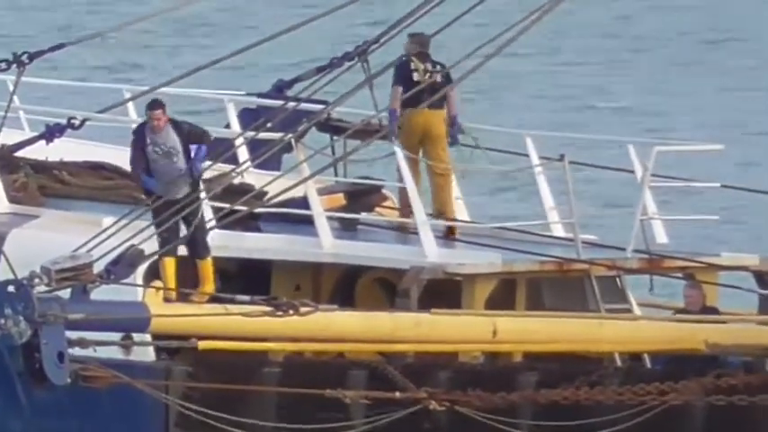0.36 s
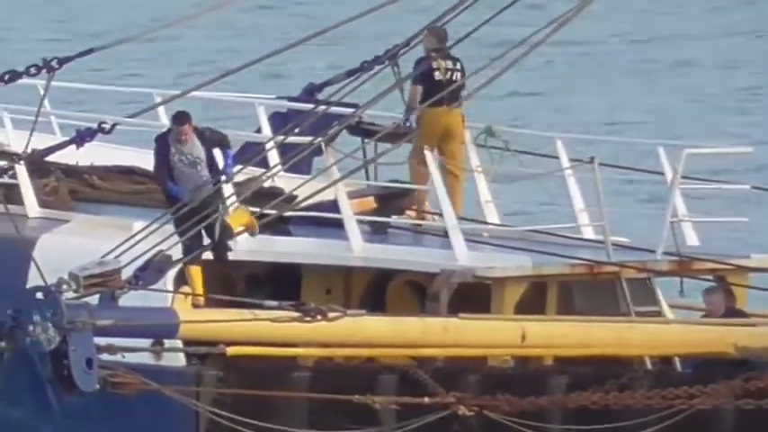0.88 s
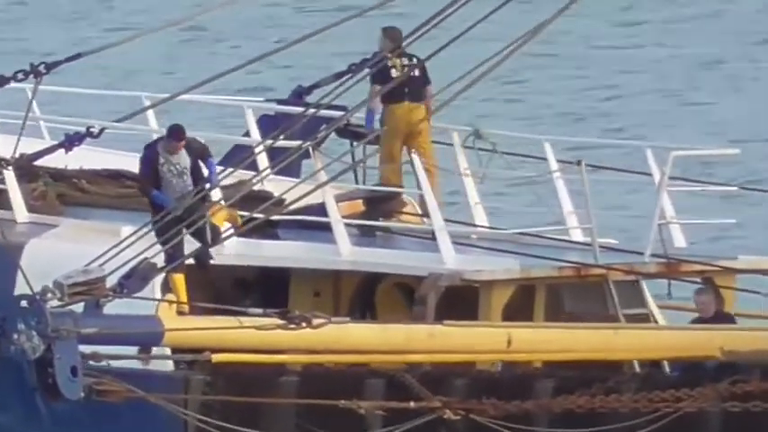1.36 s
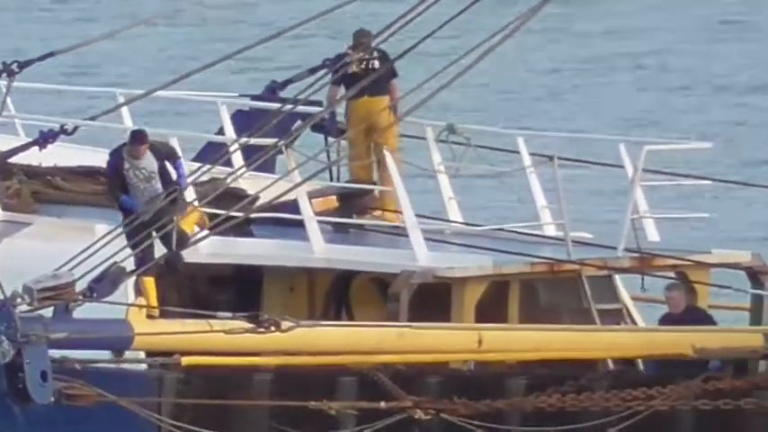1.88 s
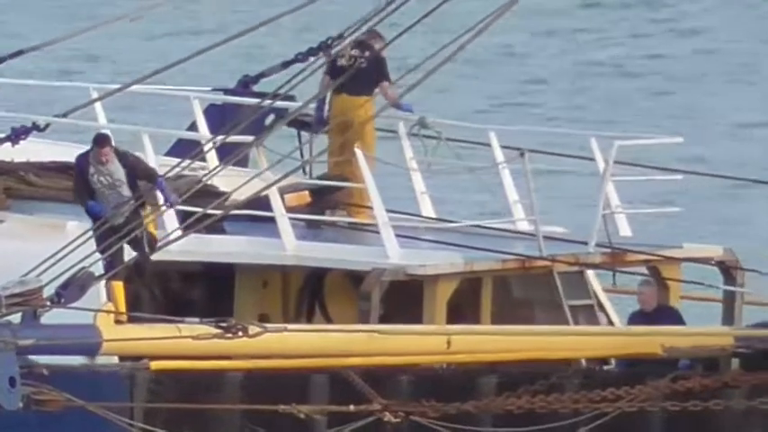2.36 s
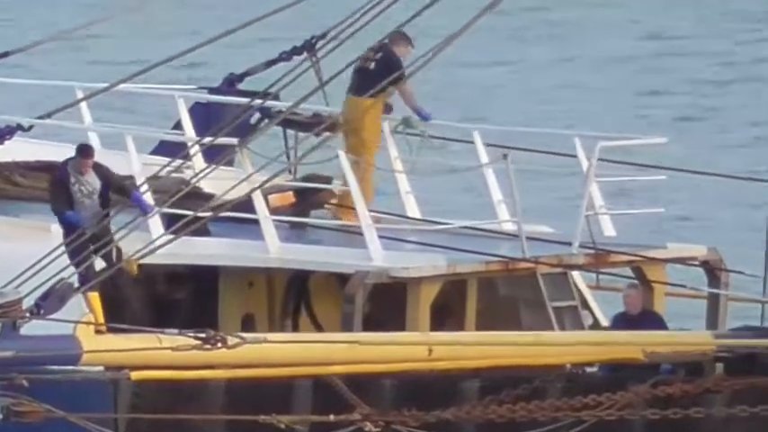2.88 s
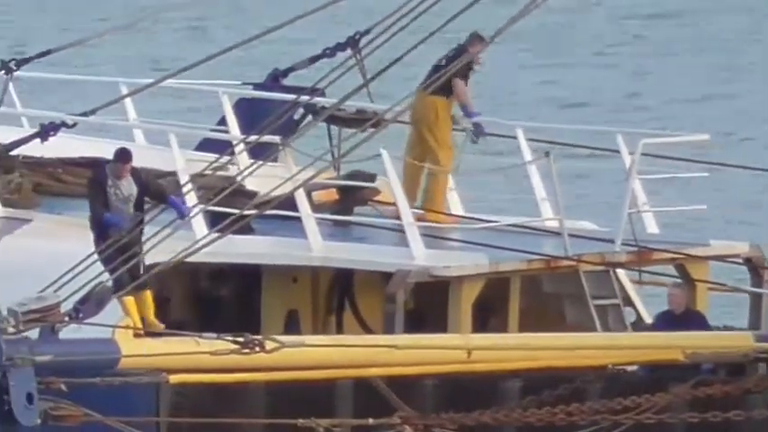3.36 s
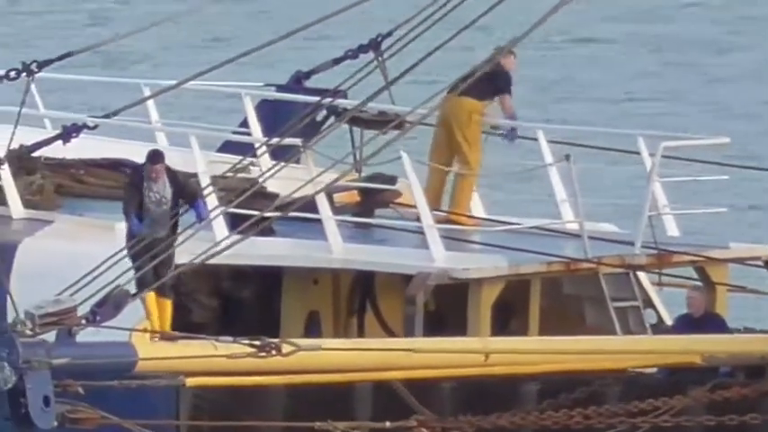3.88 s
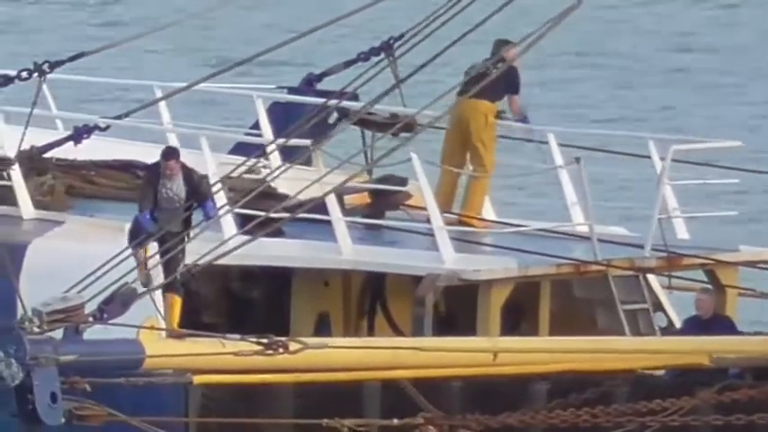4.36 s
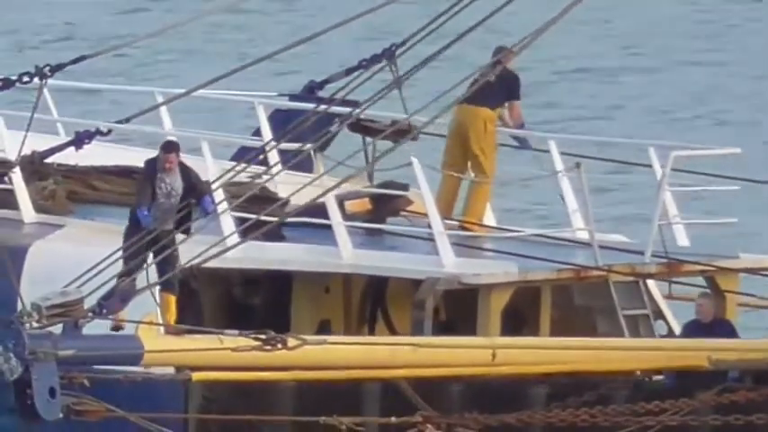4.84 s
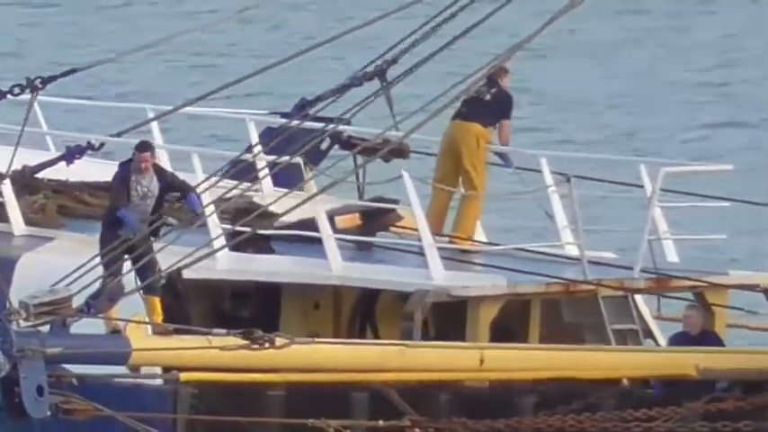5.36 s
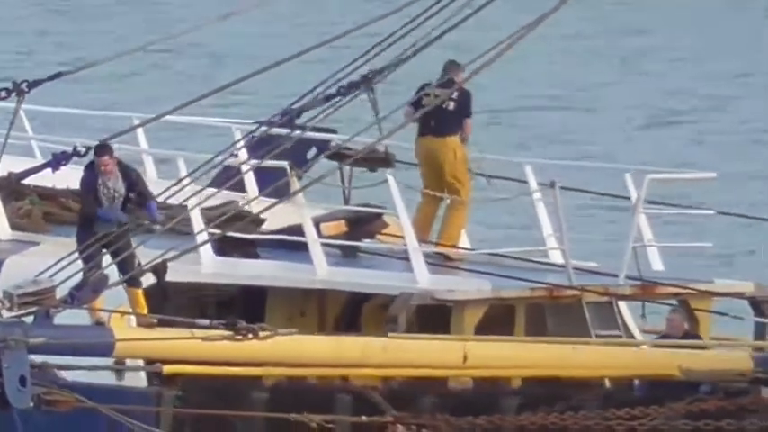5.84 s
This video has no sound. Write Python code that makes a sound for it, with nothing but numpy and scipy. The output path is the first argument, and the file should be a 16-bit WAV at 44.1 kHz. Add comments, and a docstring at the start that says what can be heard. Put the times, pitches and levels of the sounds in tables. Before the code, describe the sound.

A distant outdoor microphone picks up mostly low-frequency machinery: an idling diesel, other steady motor tones and a dark rumble. A low hum drifts in and out, growing boldest late on. Grainy water stays faint beneath, gently ebbing. Far-off bird whistles flick by around two seconds, then a few close, brittle clicks, and one longer, very faint high chirp. Light treble hiss continues throughout.

```python
"""A harbour heard from the quay. Throughout, a diesel idles, other machines add thin tones over a broad rumble,
and a treble hiss flickers in narrow streaks: sines make the machines, coloured noise the rest. A hum from across
the water, nearly a sine, swells and fades, strongest after four seconds. Faint water noise swells early and again
near two and three seconds. Gliding sines chirp far off from 1.5 to 2.1 s; ringing crackles tick from 3.1 to 4.3 s;
a last, longer chirp follows at 4.6 s."""
import sys
import numpy as np
from scipy import signal
from scipy.fft import rfft, irfft, next_fast_len
from scipy.io import wavfile
from scipy.ndimage import uniform_filter1d

SR = 44100
rng = np.random.default_rng(int(sys.argv[2]) if len(sys.argv) > 2 else 0)


def master_out(mix):
    """Clip the mix to full scale and print it as 16-bit PCM to the path in sys.argv[1]."""
    frames = np.transpose(np.atleast_2d(mix))
    ceiling = np.clip(frames, -1, 1)
    pcm = np.round(ceiling * 32767).astype(np.int16)
    wavfile.write(sys.argv[1], SR, pcm)


def ratio_of_db(decibels):
    """Turn decibels (scalar or array-like) into linear amplitude factors; 0 dB maps to 1."""
    return 10 ** (np.asarray(decibels, float) / 20)


N = 263718  # length in samples, about 6 s


def rms_one(x):
    """Scale a signal so that its average strength (rms) is 1."""
    return x / np.sqrt(np.mean(x ** 2) + 1e-20)


def in_time(rows):
    """Draw straight lines between the points of a curve and read its columns at every sample."""
    seconds, *columns = np.transpose(rows)
    return [np.interp(np.arange(N) / SR, seconds, column) for column in columns]


def at_hz(points, hz):
    """Read a curve over frequency, with frequency on a log scale as the ear hears it."""
    point_hz, value = np.array(points).T
    return np.interp(np.log(hz), np.log(point_hz), value)


def drift(rate_hz):
    """Slow random wandering of rms 1: noise smoothed by two equal low-passes with their corner at rate_hz."""
    coarse = 40  # samples between the points of the slow curve
    r = np.exp(-2 * np.pi * rate_hz * coarse / SR)
    noise = rng.standard_normal(N // coarse + 4002)
    slow = signal.lfilter([1], [1, -2 * r, r * r], noise)[4000:]  # leave out the filter's start
    return np.interp(np.arange(N) / coarse, np.arange(len(slow)), rms_one(slow))


def pan(x, left_db):
    """Place a mono sound between the microphones; left_db is left minus right."""
    return x * ratio_of_db(np.array([[.5], [-.5]]) * left_db)


def coloured(spectrum, white):
    """Shape two white noises to a level per Hz, then mix them so that left and right are partly alike."""
    # How alike left and right are. Each row: frequency in Hz, likeness from 0 to 1.
    likeness = [(30, .92), (130, .97), (290, .78), (640, .52), (1400, .14), (3100, .22), (6800, .13),
                (15000, .13)]
    # Which side is louder. Each row: frequency in Hz, left minus right in dB.
    balance = [(60, 0.26), (240, 0.0), (950, 1.0), (3770, 0.0058), (15000, -0.25)]
    size = next_fast_len(N)
    hz = np.maximum(np.arange(size // 2 + 1) * SR / size, 1)
    mid, side = rfft(white, size) * np.sqrt(SR / 2) * ratio_of_db(at_hz(spectrum, hz))
    alike = np.clip(at_hz(likeness, hz), 0, 1)
    mid = mid * np.sqrt((1 + alike) / 2)
    side = side * np.sqrt((1 - alike) / 2)
    tilt = ratio_of_db(at_hz(balance, hz) / 2)
    return irfft([(mid + side) * tilt, (mid - side) / tilt], size)[:, :N]


def streaky(noise, streak_db):
    """Make narrow bands of a noise sink and return, each for about a tenth of a second."""
    spectrum = signal.stft(noise, nperseg=2048, noverlap=1536)[2]
    flicker = rms_one(uniform_filter1d(rng.standard_normal(spectrum.shape), size=8, axis=-1))
    gain = ratio_of_db(streak_db * np.minimum(flicker, .6))  # dips go deep, peaks are capped
    out = signal.istft(spectrum * gain, nperseg=2048, noverlap=1536)[1][:, :N]
    return out * np.std(noise) / np.std(out)  # keep the overall strength


def wavering(hz, level_db, waver_db):
    """A sine whose level wavers slowly on its way over the water."""
    phase = 2 * np.pi * (hz * np.arange(N) / SR + rng.random())
    level = ratio_of_db(level_db + waver_db * drift(1.3))
    return np.sqrt(2) * level * np.sin(phase)


def hiss():
    """Hiss: treble noise in which narrow streaks flicker."""
    # Spectrum of the hiss. Each row: frequency in Hz, level in dB per Hz.
    hiss_spectrum = [(1000, -125), (4000, -120), (6300, -118.5), (7900, -109.5), (8500, -111), (9300, -109),
                     (10300, -111), (11400, -108.5), (12800, -112), (13300, -110), (13700, -112.5),
                     (14050, -108.5), (14500, -112), (16000, -113)]
    return coloured(hiss_spectrum, streaky(rng.standard_normal((2, N)), streak_db=15.0))


def chirps():
    """Far bird: short gliding whistles, roughened by distance, trembling in level and unsteady in pitch."""
    # Each row: start in seconds, length in seconds, first pitch in Hz, last pitch in Hz,
    # level in dB before the fade and tremble.
    notes = [(1.475, .045, 4380, 4350, -82), (1.82, .028, 4110, 4110, -75), (1.853, .018, 4100, 4150, -74),
             (1.858, .018, 4300, 4600, -78), (1.872, .03, 4400, 4360, -76), (2.045, .03, 3400, 3380, -78),
             (2.08, .035, 3250, 3420, -79), (4.57, .28, 5060, 5075, -85)]
    fade_db_per_s = 25
    out = np.zeros((2, N))
    tremble = ratio_of_db(1.5 * drift(70))
    unsteady_hz = 15 * drift(50)
    for start, length, first_hz, last_hz, db in notes:
        i, n = round(start * SR), round(length * SR)
        hz = np.linspace(first_hz, last_hz, n) + unsteady_hz[i:i + n]
        note = np.sin(2 * np.pi * np.cumsum(hz) / SR)
        note *= signal.windows.tukey(n, .5)  # soft start and end
        note *= ratio_of_db(-fade_db_per_s * np.arange(n) / SR)
        out[:, i:i + n] += np.sqrt(2) * ratio_of_db(db) * note * tremble[i:i + n]
    return out


def ticks():
    """Each tick is a brief broad crackle that also strikes the short ringing tones of a plastic body."""
    # Each row: start in seconds, peak level in dB before panning, brightness of the ring in dB per octave,
    # left minus right in dB.
    strikes = [(3.1084, -53, -4, -1), (3.6622, -41, 0, -6), (3.6655, -50, 6, -3), (3.7700, -60, 0, 0),
               (4.2584, -52, 3, -1), (4.2704, -49, 5, -1)]
    # Ringing tones of the body. Each row: frequency in Hz, level in dB before the brightness is added,
    # time to fade by 60 dB in seconds.
    body = [(2700, -16, .012), (4000, -9, .005), (6960, -6, .003), (9320, -4, .003), (12300, -4, .003),
            (14800, -6, .003)]
    crackle_s, ring_db = .0005, -12.0  # time for the crackle to fall to 37 %, gain of the ring
    out = np.zeros((2, N))
    t = np.arange(SR // 50) / SR
    for start, peak_db, bright_db, left_db in strikes:
        i = round(start * SR)
        crackle = rng.standard_normal(len(t)) * np.exp(-t / crackle_s)
        ring = 0
        for hz, mode_db, t60 in body:
            fading_db = mode_db + bright_db * np.log2(hz / 8000) - 60 * t / t60
            ring = ring + ratio_of_db(fading_db) * np.sin(2 * np.pi * hz * t)
        struck = np.convolve(ring, crackle)[:len(t)]
        tick = np.diff(crackle, prepend=0) + ratio_of_db(ring_db) * struck  # the difference brightens the crackle
        out[:, i:i + len(t)] += pan(ratio_of_db(peak_db) * tick / np.abs(tick).max(), left_db)
    return out


def wash():
    """Water: grainy noise like dense droplets, ebbing steadily, swelling now and then and fluttering a little."""
    # Spectrum of the wash. Each row: frequency in Hz, level in dB per Hz before the changes in time.
    wash_spectrum = [(700, -125), (1500, -113), (1850, -111), (2150, -105.5), (2700, -111), (3500, -111),
                     (4200, -111), (5200, -116), (6300, -122), (8000, -120), (12000, -124)]
    # Each row: centre of the swell in seconds, width in seconds, rise in dB.
    swells = [(0.4, 0.056, 0.86), (2.3, 0.27, 4.8), (3.0, 0.4, 2.1)]
    start_db, ebb_db_per_s, grain_db = 0.72, -0.63, 3.0
    t = np.arange(N) / SR
    level_db = start_db + ebb_db_per_s * t
    for centre, width, rise_db in swells:
        level_db += rise_db * np.exp(-((t - centre) / width) ** 2)
    droplet_size = np.minimum(rng.exponential(1, N), 4)
    grains = rng.standard_normal((2, N)) * ratio_of_db(grain_db * droplet_size)
    water = coloured(wash_spectrum, streaky(rms_one(grains), streak_db=4.5))
    return ratio_of_db(level_db + 0.2 * drift(25)) * water


def rumble():
    """Engines and wind: broad coloured noise, breathing slowly and slightly lumpy."""
    # Spectrum of the rumble. Each row: frequency in Hz, level in dB per Hz before the breathing.
    rumble_spectrum = [(15, -108), (30, -91), (48, -81), (62, -78), (95, -77), (135, -70.5), (200, -74),
                       (228, -80), (250, -72), (285, -79), (400, -80.5), (560, -84.5), (700, -88),
                       (1000, -92.5), (1300, -96.5), (1550, -99), (1800, -108), (3000, -130)]
    breathing_db = 0.27 * drift(0.88) + 0.61 * drift(6.1)
    return ratio_of_db(breathing_db) * coloured(rumble_spectrum, rng.standard_normal((2, N)))


def machines():
    """Other machines: unrelated tones of steady pitch and gently wavering level."""
    # Each row: frequency in Hz, level in dB around which the tone wavers.
    tones = [(51.8, -74), (86.8, -66), (95.6, -64), (100.3, -61), (250.3, -62), (15625, -92)]
    return sum(wavering(hz, db, waver_db=1.5) for hz, db in tones)


def diesel():
    """Idling diesel: every tone is a whole multiple of one steady engine cycle."""
    # Each row: multiple of the engine cycle, level in dB around which the tone wavers.
    orders = [(5, -80), (6, -61), (7, -70.5), (12, -56), (13, -60), (14, -76.5), (15, -56), (18, -65),
              (19, -64.5), (21, -68.5), (22, -77.5), (23, -76.5), (24, -75), (30, -74.5), (31, -74.5),
              (33, -75), (40, -77), (44, -77.5), (45, -78), (46, -77.5)]
    cycle_hz = 12.147
    return sum(wavering(order * cycle_hz, db, waver_db=2.5) for order, db in orders)


def hum():
    """Hum from across the water: a direct sine beats against a scattered share of wandering size and phase."""
    # The direct hum swells and fades as the air between changes. Each row: time in seconds, level in dB.
    hum_level = [(0.0, -42.5), (0.15, -41.5), (0.5, -44.5), (0.74, -38), (1.15, -45.5), (1.31, -58),
                 (1.5, -46), (1.7, -48.5), (1.8, -60), (2.2, -61), (2.3, -46), (2.42, -60), (2.9, -46),
                 (3.25, -57), (3.4, -46.5), (3.9, -46), (4.0, -53), (4.1, -43), (4.4, -34), (4.5, -38.5),
                 (4.8, -31), (5.48, -44), (5.78, -35.5), (5.91, -46), (5.98, -37)]
    # Each row: time in seconds, pitch in Hz.
    hum_pitch = [(0, 122.8), (1.2, 121.7), (2.0, 123.0), (4.0, 121.9), (4.5, 120.7), (5.98, 120.6)]
    scatter_db, scatter_hz = -53, 3.23  # level and rate of wandering
    phase = 2 * np.pi * np.cumsum(in_time(hum_pitch)[0]) / SR
    direct = np.sqrt(2) * ratio_of_db(in_time(hum_level)[0]) * np.sin(phase)
    scattered = drift(scatter_hz) * np.sin(phase) + drift(scatter_hz) * np.cos(phase)
    return direct + ratio_of_db(scatter_db) * scattered


def scene():
    """Add up the sources: hum and chirps in the middle, diesel and machines a hair to the left."""
    engines = pan(diesel() + machines(), 0.42)
    return chirps() + ticks() + wash() + rumble() + engines + hum()


def top_cut(x):
    """Nothing passes above the cut-off."""
    return signal.sosfilt(signal.butter(12, 15720, fs=SR, output="sos"), x)


def record(dry):
    """Add the hiss and finish the mix."""
    return top_cut(dry + hiss())


dry = scene()
out = record(dry)
master_out(out)
```